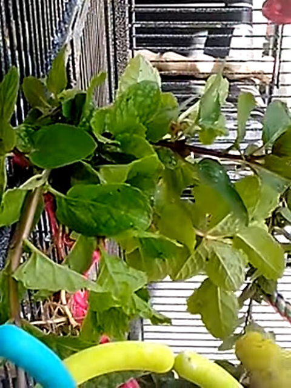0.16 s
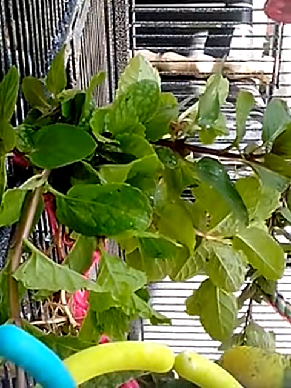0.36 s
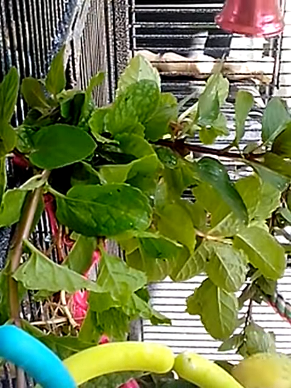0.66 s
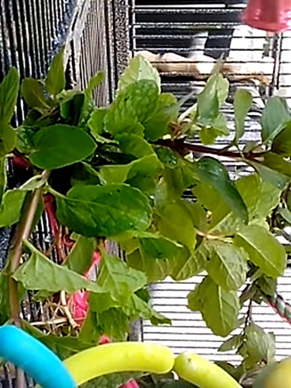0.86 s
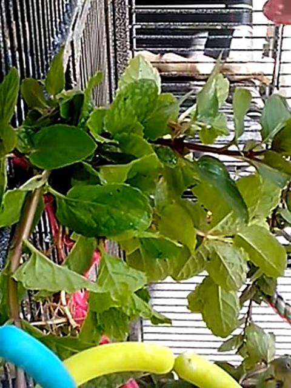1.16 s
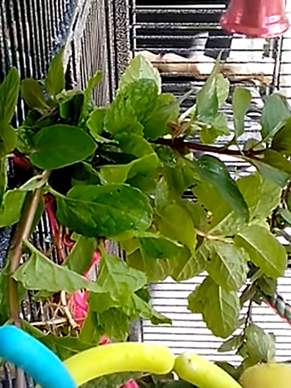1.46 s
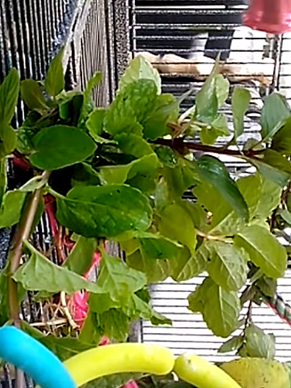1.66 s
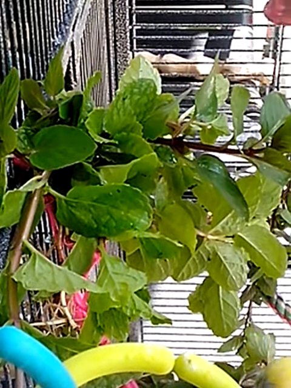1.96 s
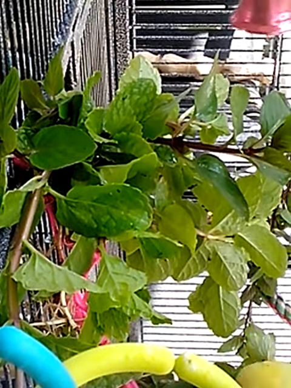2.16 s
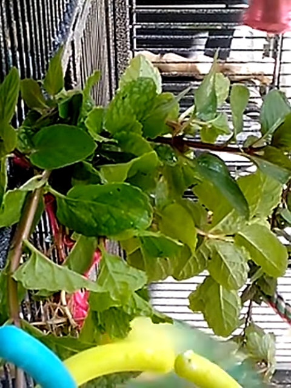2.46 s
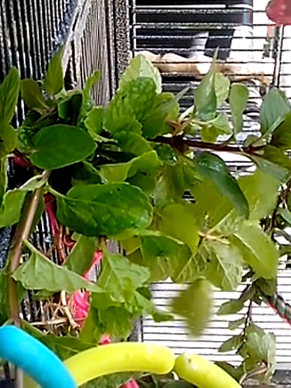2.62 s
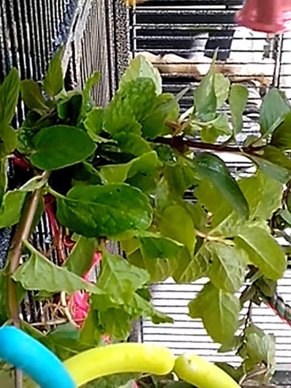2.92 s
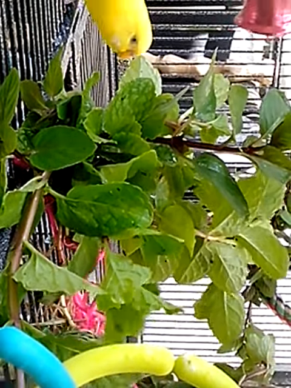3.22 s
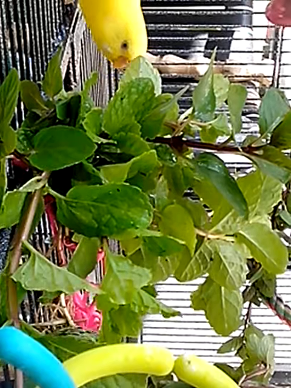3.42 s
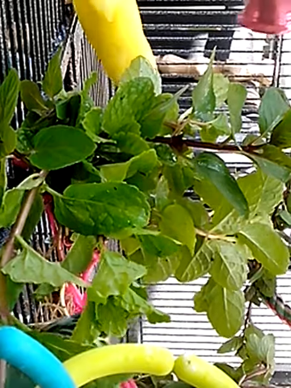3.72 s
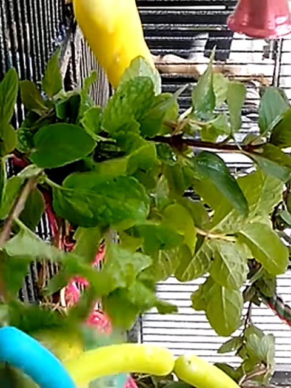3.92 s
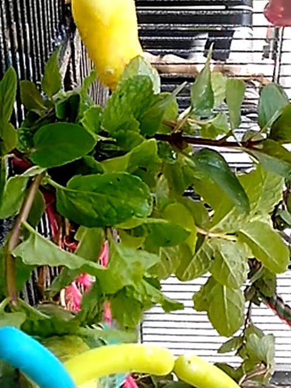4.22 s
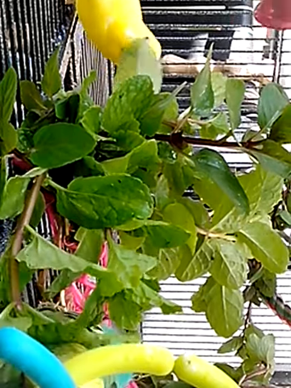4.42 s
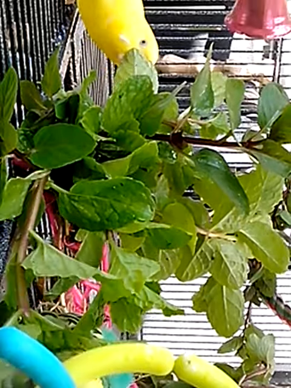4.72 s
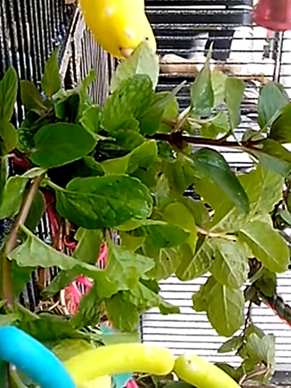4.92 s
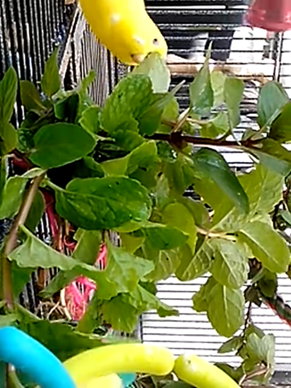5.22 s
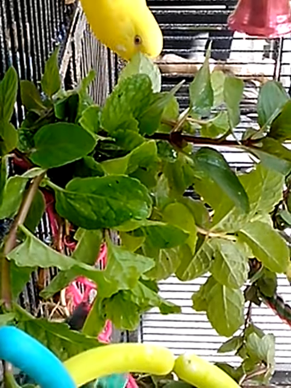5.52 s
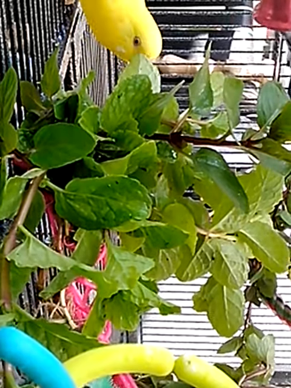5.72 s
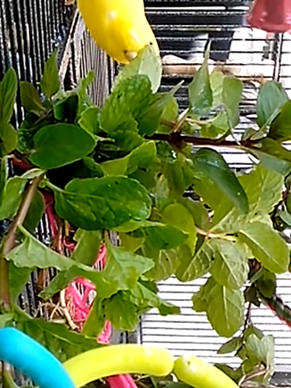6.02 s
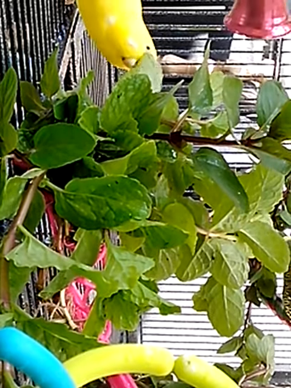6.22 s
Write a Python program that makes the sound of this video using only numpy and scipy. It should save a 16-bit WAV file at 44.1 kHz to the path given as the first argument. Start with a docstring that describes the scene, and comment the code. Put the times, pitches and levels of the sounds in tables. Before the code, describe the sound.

Budgerigars chatter close to the microphone in a small quiet room. A few dry rasps and light wing puffs come first, then a pause, a bright burst of chirps and warbling, and a flutter. After another lull come the loudest ringing chirps, then a longer run of scratchy warbling, a soft perch bump and small closing notes. Near walls add a short tail over faint hush.

```python
"""Budgerigars warble close to the microphone in a cage in a small, quiet room.
Their voices are gliding tones shaken by hoarseness, from nearly pure whistles to rough chirps;
dry rasps are uneven pulses and noise in a broad band. Wings flutter as puffs of shaped noise,
and bumps on a perch ring a few decaying modes. Near walls add echoes and a short tail,
over a faint steady hush; the recorder quiets what is faint and cuts off the top."""
import sys
import numpy as np
from scipy import signal
from scipy.fft import rfft, irfft, next_fast_len
from scipy.io import wavfile
from scipy.ndimage import uniform_filter1d, minimum_filter1d

SR = 44100
rng = np.random.default_rng(int(sys.argv[2]) if len(sys.argv) > 2 else 0)


def digitize_waveform(pressure):
    """Quantize a signal to 16-bit integers and store it at the path in sys.argv[1].

    Rows of a 2-D input are taken as channels; values are limited to [-1, 1].
    """
    field = np.atleast_2d(pressure).T
    bounded = np.clip(field, -1, 1)
    quanta = np.round(bounded * 32767).astype(np.int16)
    wavfile.write(sys.argv[1], SR, quanta)


N = 280913


def from_db(db):
    """Decibels to gain."""
    return 10 ** (np.asarray(db) / 20)


def rms_one(x):
    """Scale to unit power."""
    return x / np.sqrt(np.mean(x ** 2) + 1e-20)


def add(out, start_s, sound):
    """Mix a sound in at a time in seconds, kept inside the scene."""
    at = int(np.clip(start_s * SR, 0, N - 1))
    out[at:at + len(sound)] += sound[:N - at]


def mix(sounds):
    """Sum pairs of (start_s, sound)."""
    out = np.zeros(N)
    for start_s, sound in sounds:
        add(out, start_s, sound)
    return out


def at_hz(points, hz):
    """Read a spectrum in dB on a log-frequency axis."""
    knots_hz, db = np.transpose(points)
    return np.interp(np.log(hz + 1), np.log(knots_hz), db)


def coloured(source, shape_db):
    """Give a sound a spectrum, in dB as a function of frequency; unit power."""
    padded = next_fast_len(len(source))
    hz = np.fft.rfftfreq(padded, 1 / SR)
    spectrum = rfft(source, padded) * from_db(shape_db(hz))
    return rms_one(irfft(spectrum, padded)[:len(source)])


def noise(size, shape_db):
    """Unit noise with a given spectrum."""
    return coloured(rng.standard_normal(size), shape_db)


def wobble(size, rate_hz):
    """Random unit motion, up to about the given rate."""
    return noise(size, lambda hz: -20 * np.log10(1 + (hz / rate_hz) ** 2))


def gate(length_s, rise_s, fall_s):
    """Time axis around a sound, and its smooth swell and fade, each half done at the nominal ends."""
    t = np.arange(-rise_s, length_s + fall_s, 1 / SR)
    opening = np.clip((t + rise_s) / (2 * rise_s), 0, 1)
    closing = np.clip((length_s + fall_s - t) / (2 * fall_s), 0, 1)
    return t, np.sin(np.pi / 2 * opening) ** 2 * np.sin(np.pi / 2 * closing) ** 2


def room_tone(level_db=-64.5):
    """The quiet room's hush is steady noise with a fixed spectrum."""
    # spectrum of the quiet room: freq_hz, relative_db
    hush_shape = [(25, -8), (100, -9.5), (122, 2), (170, 2.5), (260, -3.5), (500, -7), (2600, -10.5),
                  (5500, -14), (6600, -9), (7500, -13.5)]
    return from_db(level_db) * noise(N, lambda hz: at_hz(hush_shape, hz))


def perch(contact_s=0.0021, spread_db=3.7):
    """Each soft bump rings every mode of perch and cage with a strength of its own."""
    # bumps on the perch: start_s, level_db
    bumps = [(.001, -45.5), (5.539, -45.5), (5.564, -36.5), (5.589, -38), (5.61, -38)]
    # modes of perch and cage: freq_hz, level_db relative to the bump, t60_s
    modes = [(274, -8, 0.37), (304.5, -6, 0.13), (533, 14.5, 0.0094), (777, -10.5, 0.14)]
    out, t = np.zeros(N), np.arange(SR // 2) / SR
    for start_s, bump_db in bumps:
        for hz, mode_db, t60_s in modes:
            decay = np.exp(-np.log(1000) * t / t60_s)
            onset = 1 - np.exp(-t / contact_s)
            ring = np.sin(2 * np.pi * hz * t) * decay * onset
            add(out, start_s, from_db(bump_db + mode_db + rng.normal(0, spread_db)) * ring)
    low_cut = signal.butter(4, 200, "high", fs=SR, output="sos")
    return signal.sosfilt(low_cut, out)


def wings():
    """Each wing beat pushes a soft puff of air, heard as a short swell of noise."""
    # wing beats: time_s, level_db
    beats = [(.005, -51.5), (0.422, -54), (0.499, -55.5), (2.619, -53.5), (2.671, -48), (2.714, -47),
             (2.801, -47.5), (2.849, -58)]
    # air pushed by the wings: freq_hz, relative_db
    air_shape = [(60, -49), (150, -4), (260, -17.5), (550, 0.5), (1000, -6.5), (2500, -6.5), (7000, -24.5)]
    out = np.zeros(N)
    for time_s, level_db in beats:
        t, swell = gate(0.057, rise_s=0.0025, fall_s=0.024)
        puff = swell * noise(len(t), lambda hz: at_hz(air_shape, hz))
        # the puff begins a little ahead of the listed time
        add(out, time_s - .011, from_db(level_db) * puff)
    return out


def chaos(size, centre_hz, octaves, depth_db, buzz_hz=870, unsteady=.09, air=1.0, grain_db=4, lowest=.3):
    """The syrinx rattles: uneven pulses and turbulent air in a broad band, coloured by the throat."""
    # colour of throat and beak on the noisy part of the voice: freq_hz, relative_db
    throat = [(500, -9), (900, -5.5), (2400, 2.5), (3600, -2.5), (5200, -5.5), (6700, 2.5), (7500, -10.5)]

    def band_db(hz):
        away = np.log2((hz + 1) / centre_hz) / octaves
        # the cut sits at a share `lowest` of the centre
        low_cut_db = 10 * np.log10(1 + (lowest * centre_hz / (hz + 1)) ** 10)
        return at_hz(throat, hz) - depth_db * np.log2(1 + away ** 4) - low_cut_db

    cycles = np.cumsum(buzz_hz * (1 + unsteady * wobble(size, 200))) / SR
    # one click at each completed cycle
    pulses = rms_one(np.diff(np.floor(cycles), prepend=0))
    turbulence = air * rng.standard_normal(size)
    grain = from_db(grain_db * np.tanh(wobble(size, 340)))
    return coloured((pulses + turbulence) * grain, band_db)


def rasp(start_s, length_s, level_db, centre_hz, octaves, swell_db=5):
    """A harsh burst of syrinx rattle that swells and fades: (start_s, sound)."""
    t, swell = gate(length_s, rise_s=0.0081, fall_s=0.0065)
    pressure = rms_one(from_db(swell_db * np.sin(np.pi * np.clip(t / length_s, 0, 1))))
    burst = chaos(len(t), centre_hz, octaves, depth_db=6.5, lowest=0.13)
    return start_s - .006, from_db(level_db) * swell * pressure * burst


def rasps():
    """Dry scolding bursts, each rattling in a band of its own."""
    # harsh rasps: start_s, length_s, level_db, centre_hz, half_width_octaves
    bursts = [(0.034, 0.019, -37.5, 2170, 1.54), (0.195, 0.057, -57.5, 2070, 0.77),
              (0.334, 0.076, -46.5, 1850, 1.13), (0.404, 0.033, -35.5, 3000, 1.33),
              (0.466, 0.036, -34.5, 3140, 1.55), (1.053, 0.041, -42, 2960, 2.8),
              (1.427, 0.095, -43, 4500, 3.3), (1.692, 0.067, -30.5, 2620, 0.47),
              (1.792, .15, -31, 4450, .8), (2.045, 0.07, -36, 2380, 0.42), (2.213, 0.12, -29.5, 4240, 0.61),
              (2.439, 0.11, -53.5, 2240, 1.13), (2.593, 0.078, -45.5, 2270, 0.59),
              (2.687, 0.057, -37.5, 2770, 0.68), (2.784, 0.037, -32.5, 3060, 0.72),
              (3.204, 0.01, -34, 4060, 0.25), (4.624, 0.115, -33, 3300, 1.13),
              (4.848, 0.082, -31, 3790, 1.72), (4.997, 0.074, -26.5, 5880, 0.49),
              (5.43, 0.027, -30, 3580, 0.85), (5.605, 0.028, -37, 2720, 0.5)]
    return mix(rasp(*row) for row in bursts)


def syllable(path, hoarse, doubling_db, second_db, jitter=.12, jitter_hz=340, trill_hz=105, trill_dip=0.076,
             trill_db=5, shimmer_db=7, rattle_db=-15, third_db=-39, half_db=-4, turn_s=0.002):
    """The syrinx glides along a path of (s, Hz, dB); hoarseness shakes its pitch and its strength."""
    # colour of beak and throat on the overtones: freq_hz, gain_db
    beak = [(2500, -1.5), (4400, 5), (5500, -6), (6400, 2), (7100, 9.5), (8000, -14.5)]
    path_s, path_hz, path_db = np.transpose(path)
    t, swell = gate(path_s[-1] - path_s[0], rise_s=.005, fall_s=0.002)
    size = len(t)
    # corners of the pitch path are rounded over the turning time
    straight_hz = np.interp(path_s[0] + t, path_s, path_hz)
    arch_hz = uniform_filter1d(straight_hz, int(turn_s * SR))
    # a fast muscle trill, near trill_hz, makes brief dips in pitch and strength together
    dips = np.sin(np.pi * (trill_hz * rng.uniform(0.797, 1.1) * t + rng.random())) ** 10
    dips -= dips.mean()
    shake = jitter * hoarse * wobble(size, jitter_hz)
    pitch_hz = arch_hz * (1 + shake - trill_dip * np.sqrt(hoarse) * dips)
    phase = 2 * np.pi * np.cumsum(pitch_hz) / SR + rng.uniform(0, 4 * np.pi)
    # when the membrane doubles its period, lines appear halfway between the harmonics
    partials = [(1 / 2, doubling_db + half_db), (3 / 2, doubling_db), (2, second_db), (3, third_db)]
    tone = np.sin(phase)
    for multiple, partial_db in partials:
        gain = from_db(partial_db + at_hz(beak, multiple * arch_hz))
        tone = tone + gain * np.sin(multiple * phase)
    shimmer = shimmer_db * hoarse * np.tanh(wobble(size, 690))
    tone = tone * from_db(shimmer - trill_db * dips)
    rattle = from_db(rattle_db) * hoarse * chaos(size, arch_hz.mean(), octaves=1.0, depth_db=9)
    pressure = from_db(np.interp(path_s[0] + t, path_s, path_db))
    low_cut = signal.butter(4, 0.56 * path_hz.min(), "high", fs=SR, output="sos")
    return signal.sosfilt(low_cut, swell * pressure * (rms_one(tone) + rattle))


def sing(path, hoarse, doubling_db, second_db=-28):
    """A syllable at its place in time, led by its rise: (start_s, sound)."""
    return path[0][0] - .005, syllable(path, hoarse, doubling_db, second_db)


def glide(start_s, length_s, pitch_hz, octaves, level_db, swell_db=3):
    """Path of a short note: pitch slides evenly, air pressure peaks in the middle."""
    progress = np.arange(9) / 8
    times_s = start_s + length_s * progress
    slide_hz = pitch_hz * 2 ** (octaves * progress)
    return np.transpose([times_s, slide_hz, level_db + swell_db * np.sin(np.pi * progress)])


def slurs():
    """Single quick notes, most of them sliding in pitch."""
    # short slurs: start_s, length_s, first_pitch_hz, glide_octaves, level_db at either end
    notes = [(0.3, 0.082, 1207, 0.71, -52), (.5, 0.03, 598, -0.055, -49.5),
             (1.348, 0.014, 1380, 0.0031, -50), (1.45, 0.16, 844, -0.024, -65),
             (1.694, 0.023, 4100, -0.42, -22), (1.738, 0.035, 3800, 0.53, -23.5),
             (1.761, 0.024, 2190, 0.76, -25), (2.018, 0.03, 4305, -0.16, -38.5),
             (3.818, 0.015, 1770, -0.23, -44), (3.932, 0.03, 1860, -1.4, -47),
             (3.999, 0.023, 2232, -0.59, -31), (2.217, .012, 3800, -0.58, -27.5),
             (2.265, 0.015, 3384, -0.73, -32.5), (4.267, 0.077, 4270, 0, -55),
             (4.668, 0.0288, 1200, 0.38, -40.5), (5.163, 0.023, 2895, -0.58, -34),
             (5.475, 0.024, 1573, 0.57, -41.5), (5.666, 0.014, 2250, 0.22, -32.5),
             (5.821, 0.041, 1997, .3, -41), (6.031, 0.015, 1305, 0.9, -39.5)]
    return mix(sing(glide(*row), hoarse=0.35, doubling_db=-40) for row in notes)


def whistles(pitch_hz=6610):
    """Faint, nearly pure notes, all on the same high pitch."""
    # thin high whistles: start_s, length_s, level_db at either end
    notes = [(0.592, 0.046, -47), (1.003, 0.043, -52.5), (1.372, 0.18, -49.5), (2.347, 0.17, -51.5),
             (3.052, 0.057, -59.5), (4.584, 0.15, -50.5), (5.581, 0.046, -57.5)]
    return mix(sing(glide(start_s, length_s, pitch_hz, 0, level_db), hoarse=0.097, doubling_db=-26.5)
               for start_s, length_s, level_db in notes)


def chirps(boost_db=3.0):
    """Each chirp swells, holds its pitch and sags as it fades; the hoarser, the louder its opening rasp."""
    # chirps: start_s, hold_s, pitch_hz, level_db before the boost, hoarseness (0-1), period_doubling_db
    notes = [(1.634, 0.016, 4340, -29.5, 0.37, -9.5), (1.654, 0.045, 4210, -17, 0.16, -15),
             (1.769, .025, 3574, -15, 0.29, -26), (1.861, 0.049, 3767, -17.5, 0.42, -28.5),
             (3.676, 0.065, 3442, -34.5, 0.32, -0.5), (3.755, 0.047, 4370, -14, .36, -38.5),
             (3.82, 0.036, 3834, -18.5, 0.3, -14), (4.81, 0.033, 3614, -27.5, 0.3, -17),
             (4.96, 0.044, 2908, -24, 0.29, -19.5), (5.015, 0.032, 3616, -20.5, 0.4, -17.5),
             (5.045, .015, 5660, -23, .18, -56.5)]
    attack_s, rise_db = 0.002, 7
    release_share, fall_db, sag = .8, 22, 0.0073  # release and sag are shares of hold and pitch
    # the bright opening rasp, level relative to the chirp
    opening_db, opening_db_per_hoarseness = -36.5, 58.5
    opening_hz, opening_lead_s, opening_s = 5400, 0.012, 0.032
    sounds = []
    for start_s, hold_s, pitch_hz, level_db, hoarse, doubling_db in notes:
        path = [(start_s, pitch_hz, level_db - rise_db),
                (start_s + attack_s, pitch_hz, level_db),
                (start_s + hold_s, pitch_hz, level_db),
                (start_s + hold_s * (1 + release_share), pitch_hz * (1 - sag), level_db - fall_db)]
        rasp_db = level_db + opening_db + opening_db_per_hoarseness * hoarse
        sounds.append(sing(path, hoarse, doubling_db))
        sounds.append(rasp(start_s - opening_lead_s, opening_s, rasp_db, opening_hz, octaves=0.61))
    return from_db(boost_db) * mix(sounds)


def warble(doubling_db=-32):
    """Phrases in which the voice zigzags up and down in pitch without a break."""
    # one list of turning points per phrase: time_s, pitch_hz, level_db
    phrases = [
        [(1.972, 3767, -32), (1.996, 2737, -20.5), (2.022, 3039, -23.5), (2.036, 2603, -37), (2.052, 2087, -30),
         (2.074, 2430, -22), (2.094, 2308, -22), (2.108, 1723, -32), (2.122, 1213, -38)],
        [(2.212, 4846, -31), (2.218, 4704, -30), (2.228, 5958, -18.5), (2.242, 4149, -18.5),
         (2.254, 3537, -15.5), (2.256, 3526, -18.5), (2.268, 4440, -22.5), (2.274, 5036, -16),
         (2.29, 4640, -28.5)],
        [(2.655, 1323, -37), (2.681, 1302, -44.5), (2.695, 1185, -36.5), (2.701, 1843, -42), (2.705, 2300, -38),
         (2.737, 2330, -37), (2.755, 1750, -35.5), (2.765, 1315, -43), (2.768, 1275, -33)],
        [(2.774, 2274, -29), (2.796, 3352, -48.5), (2.806, 2474, -33.5), (2.818, 3700, -41.5),
         (2.826, 3956, -30.5), (2.84, 1855, -33), (2.85, 1708, -39), (2.878, 2423, -36), (2.898, 1756, -37.5)],
        [(3.154, 2853, -41.5), (3.166, 2520, -37), (3.168, 2490, -32.5), (3.184, 2940, -36), (3.186, 2960, -36),
         (3.198, 2650, -40), (3.203, 2500, -25)],
        [(3.209, 2287, -38), (3.225, 1747, -35), (3.247, 2240, -37), (3.255, 2394, -28.5), (3.261, 2324, -22),
         (3.272, 2100, -52)],
        [(3.856, 3002, -25), (3.87, 2240, -17.5), (3.888, 2957, -6.5), (3.924, 3563, -14.5),
         (3.956, 3240, -8.5), (3.998, 3674, -11.5), (4.008, 3220, -8), (4.014, 2740, -8), (4.02, 2180, -19)],
        [(4.024, 2530, -23.5), (4.026, 2710, -10.5), (4.036, 2983, -12), (4.05, 3333, -8), (4.066, 2865, -11.5),
         (4.072, 2634, -14)],
        [(4.535, 3940, -40), (4.543, 2840, -43), (4.551, 1810, -35), (4.561, 3575, -36.5), (4.573, 4040, -28.5),
         (4.585, 3510, -36.5), (4.597, 2366, -33), (4.607, 2820, -42.5), (4.62, 2330, -35)],
        [(4.625, 2916, -26.5), (4.651, 3296, -28), (4.663, 2446, -23), (4.699, 3540, -21.5),
         (4.701, 3384, -19.5), (4.713, 2054, -31), (4.745, 2490, -28), (4.763, 2272, -21), (4.785, 1302, -29.5)],
        [(4.855, 3777, -17), (4.869, 2433, -27), (4.885, 3400, -26), (4.887, 3290, -22), (4.893, 2300, -30.5),
         (4.897, 1620, -33), (4.925, 1627, -27.5), (4.939, 2368, -27.5), (4.96, 2280, -20)],
        [(5.065, 2657, -27), (5.095, 1803, -37.5), (5.107, 1867, -36), (5.117, 3560, -27), (5.119, 3640, -22.5),
         (5.125, 3570, -33), (5.135, 2530, -39.5), (5.147, 3690, -25.5), (5.165, 3030, -31)],
        [(5.17, 3326, -32.5), (5.184, 4430, -28.5), (5.186, 4155, -33.5), (5.2, 2837, -31), (5.218, 2255, -29),
         (5.23, 1887, -29.5), (5.246, 2550, -29.5), (5.25, 2740, -27), (5.26, 1940, -47)],
        [(5.612, 1258, -31.5), (5.622, 1298, -38.5), (5.632, 1932, -34), (5.666, 2060, -38), (5.678, 2983, -33),
         (5.692, 3870, -39.5), (5.726, 2366, -38), (5.76, 1303, -38), (5.792, 2190, -46)],
        [(6.007, 4254, -40), (6.011, 3900, -27.5), (6.031, 4760, -45.5), (6.049, 4920, -32), (6.065, 3568, -23),
         (6.085, 2090, -32.5), (6.099, 2923, -25.5), (6.119, 2468, -41.5), (6.152, 3840, -30.5)],
    ]
    # voice of each phrase in turn: hoarseness (0-1), second_harmonic_db before the beak's colour
    voices = [(.12, -35.5), (0.3, -33), (0.32, -12.5), (0.2, -23), (0.1, -31), (.16, -8), (.22, -26.5),
              (0.26, -28), (0.16, -34.5), (0.31, -19), (.3, -24.5), (0.31, -24), (0.22, -12.5), (.22, -28),
              (0.24, -15)]
    return mix(sing(path, hoarse, doubling_db, second_db)
               for path, (hoarse, second_db) in zip(phrases, voices))


def chucks(rasp_db=8, rasp_hz=1900):
    """A soft low note drops while the throat rasps above it."""
    # soft chucks: start_s, level_db of the note at either end
    calls = [(3.626, -59.5), (4.394, -49), (4.445, -56.5), (6.342, -58.5)]
    pitch_hz, length_s, glide_octaves = 830, 0.02, -0.21
    sounds = []
    for start_s, level_db in calls:
        path = glide(start_s, length_s, pitch_hz, glide_octaves, level_db)
        sounds.append(sing(path, hoarse=0.12, doubling_db=-32))
        sounds.append(rasp(start_s, length_s, level_db + rasp_db, rasp_hz, octaves=0.68))
    return mix(sounds)


def room(x, t60_s=0.19, tail_db=-8, build_s=0.027, treble_db=3.5):
    """Near walls give a few reflections, then a short diffuse tail builds and decays."""
    # reflections off near walls: delay_s, gain relative to the direct sound
    echoes = [(.0023, 0.093), (.0051, 0.17), (.0094, 0.28), (0.0168, .24)]
    t = np.arange(SR // 2) / SR
    tail = noise(len(t), lambda hz: at_hz([(1000, 0.69), (3000, 0.91), (6500, treble_db)], hz))
    tail *= (1 - np.exp(-t / build_s)) * np.exp(-np.log(1000) * t / t60_s)
    response = from_db(tail_db) * tail / np.sqrt(np.sum(tail ** 2))
    response[0] += 1  # direct sound
    for delay_s, gain in echoes:
        response[int(delay_s * SR)] += gain
    return signal.fftconvolve(x, response / np.sqrt(np.sum(response ** 2)))[:N]


def scene():
    """Birds and cage in the room, over its faint steady hush."""
    hush = room_tone()
    voices = rasps() + slurs() + whistles() + chirps() + warble() + chucks()
    return (room(perch() + wings() + voices) + hush)[None]


def record(dry, knee_db=-56, quieting_db=5, ceiling=.85, cutoff_hz=7400):
    """A noise suppressor turns down whatever is faint, a limiter holds the peaks, the top edge is steep."""
    power = uniform_filter1d(dry ** 2, SR // 100)
    # near 1 well below the knee, near 0 well above it
    faint = 1 / (1 + np.maximum(power, 0) / from_db(knee_db) ** 2)
    peak = -minimum_filter1d(-np.abs(dry), SR // 200)
    limiter = uniform_filter1d(np.minimum(1, ceiling / (peak + 1e-9)), SR // 200)
    edge = signal.ellip(8, .3, 65, cutoff_hz, fs=SR, output="sos")
    return signal.sosfilt(edge, dry * from_db(-quieting_db * faint) * limiter)


dry = scene()
out = record(dry)
digitize_waveform(out)
```